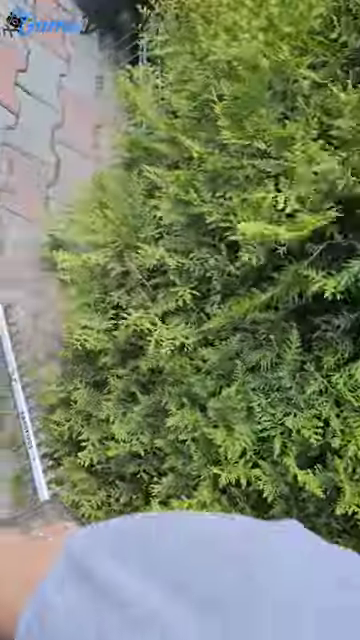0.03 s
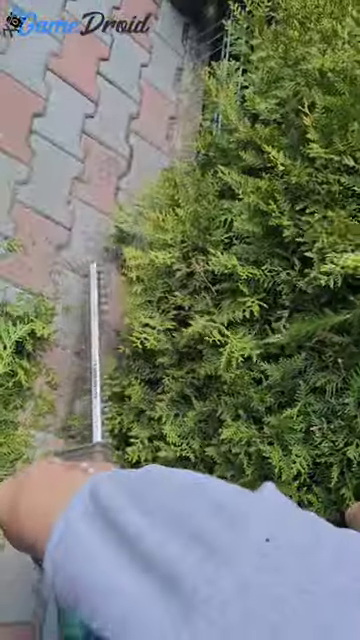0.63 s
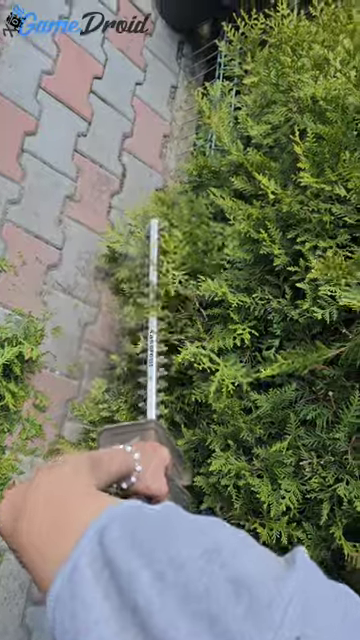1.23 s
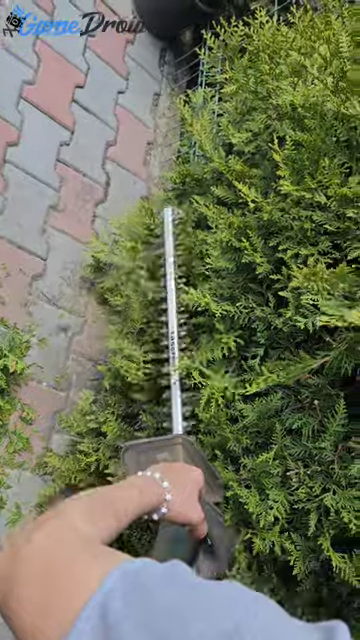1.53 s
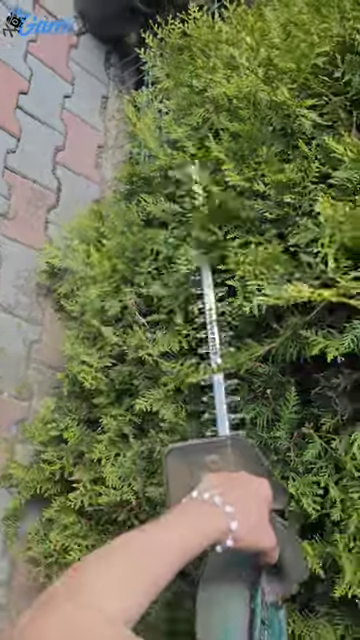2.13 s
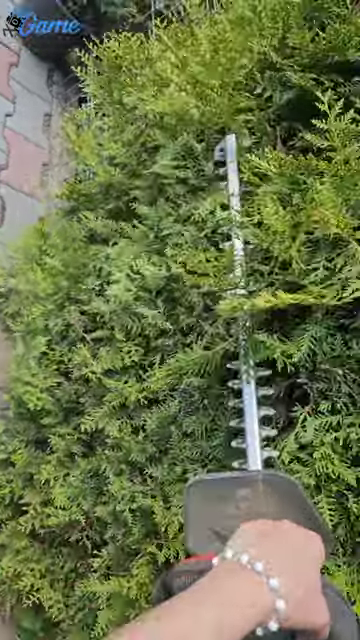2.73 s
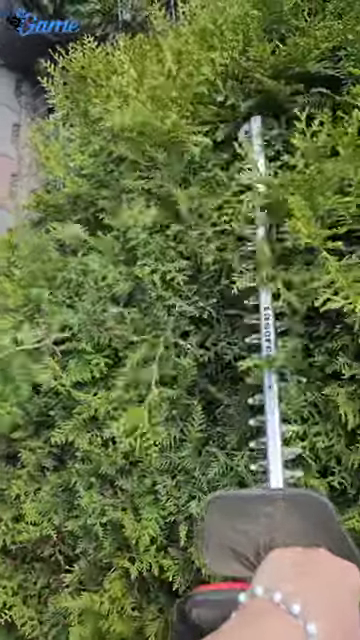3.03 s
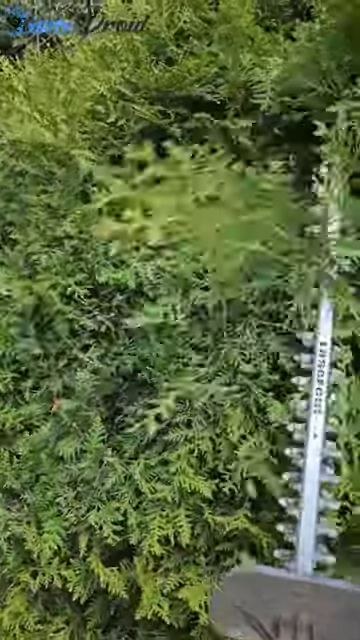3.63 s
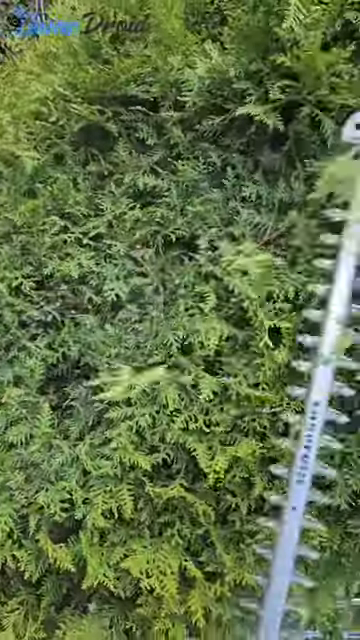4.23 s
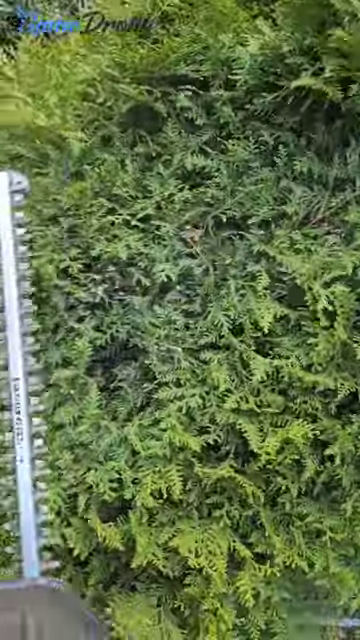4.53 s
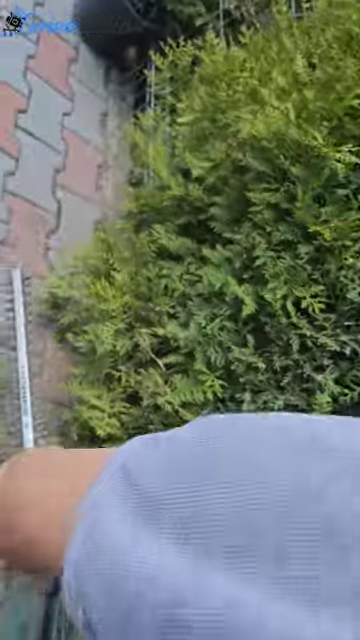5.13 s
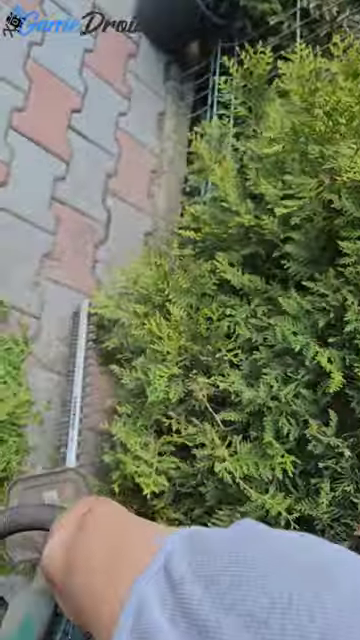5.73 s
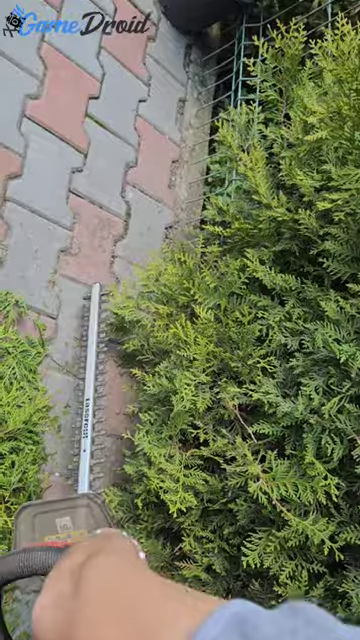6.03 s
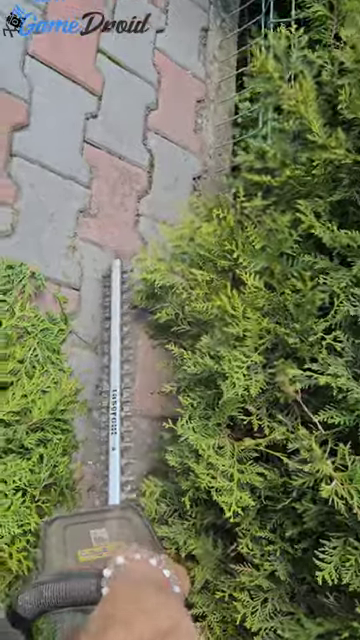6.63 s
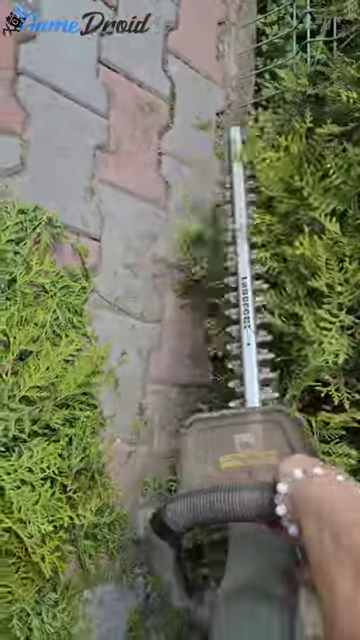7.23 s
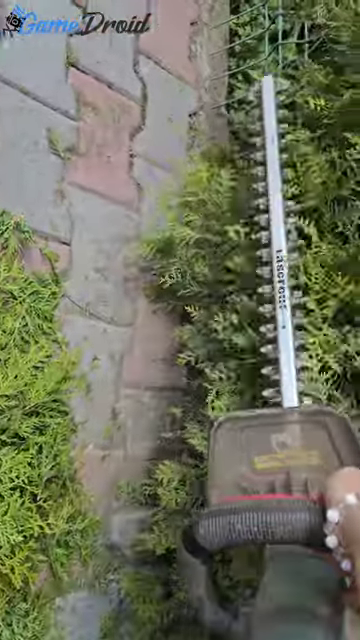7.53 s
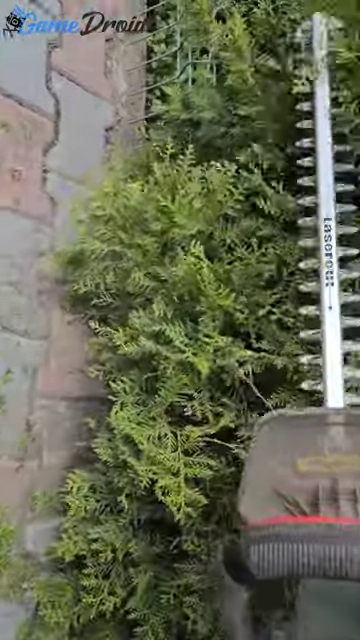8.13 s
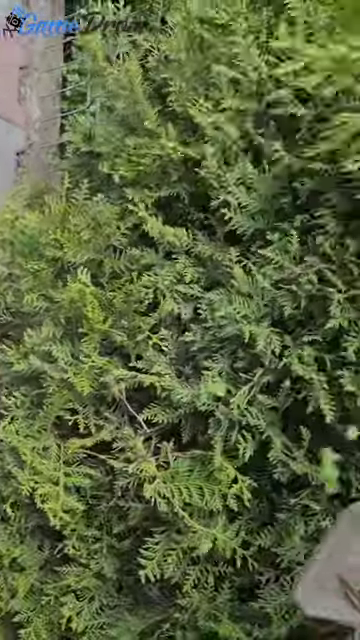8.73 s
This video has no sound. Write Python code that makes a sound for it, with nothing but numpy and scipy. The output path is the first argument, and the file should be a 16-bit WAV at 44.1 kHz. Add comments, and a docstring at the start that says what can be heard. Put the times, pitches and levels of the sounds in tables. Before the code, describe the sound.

In a quiet garden, a few small clicks lead into the loud, fast rattle of a hedge trimmer held close. Its blades shear twigs and chew woody stems with a faint metallic ring, while wind briefly bumps the microphone. The motor brakes, leaving about two seconds of soft leaf rustle and handle clicks. Then it spins up again, clacking freely before biting back into the hedge.

```python
"""A cordless hedge trimmer, very close, whirrs up and chatters into a conifer hedge, twice over.
Its crank turns 21-22 times a second: gears rattle, steel blades hiss, shear twigs on both strokes
and knock as they reverse, ringing the bar. Woody stems crunch and crack between the teeth.
Before and between the runs, foliage and a sleeve rustle and the grip clicks.
Behind it all lies a quiet garden, with a few puffs of wind on the microphone."""
import sys
import numpy as np
from scipy import signal
from scipy.fft import rfft, irfft, next_fast_len
from scipy.io import wavfile
from scipy.ndimage import uniform_filter1d, map_coordinates

SR = 44100
rng = np.random.default_rng(int(sys.argv[2]) if len(sys.argv) > 2 else 0)


def digitize_waveform(pressure):
    """Quantize a signal to 16-bit integers and store it at the path in sys.argv[1].

    Rows of a 2-D input are taken as channels; values are limited to [-1, 1].
    """
    field = np.atleast_2d(pressure).T
    bounded = np.clip(field, -1, 1)
    quanta = np.round(bounded * 32767).astype(np.int16)
    wavfile.write(sys.argv[1], SR, quanta)


N = 387638
TIME = np.arange(N) / SR
HARD_REVERSAL_REV, SOFT_REVERSAL_REV = .695, .175  # crank angles where the blades turn back

# Bright crackle of sprigs and clicks: frequency_hz, level_db
CRACKLE_SPECTRUM = [(1000, -14.5), (3500, -4), (7500, 2), (8600, -9.5), (9500, -7.5), (10800, -11.5),
                    (15500, -10.5)]


def trimmer():
    """One crank times the layers of the machine; the depth of the cut loads them."""
    # How far the blades are into the hedge: time_s, depth (0-1)
    hedge_depth = [(.8, 0.12), (1.05, 0.06), (1.15, 0.42), (2.01, 0.39), (2.05, 0.74), (2.32, 0.74),
                   (2.39, 0.43), (2.45, 0.78), (2.7, 0.77), (3.6, 0.98), (4.15, 0.67), (4.35, 0.35),
                   (6.75, 0.13), (6.98, 0.15), (7.12, 0.48), (7.27, 0.48), (7.4, 0.73), (7.8, 0.88),
                   (8.1, 0.63), (8.26, 0.31), (8.4, 0.8), (8.7, 0.96)]
    angle, speed, force = motor()
    depth = np.clip(automation(hedge_depth), 0, 1)
    cuts = force ** 3 * cutting(angle, speed, depth)
    accents = clack(angle, force, depth) + singing_modes(angle, speed, force) + woody_stems(force)
    rattle = drive_rattle(angle, speed, force, depth, cuts)
    return rattle + accents + blades(angle, force, depth, cuts) + motor_hum(angle, force, depth)


def motor():
    """Spin-up, cruise and brake, as crank angle (rev), speed (rev/s) and drive force (0-1)."""
    # Trigger pulls: pressed_s, released_s
    runs = [(0.253, 4.36), (6.506, 9)]
    # Cruising speed, sagging in thick growth: time_s, speed_rev_per_s
    cruise_speed = [(.9, 22.03), (1.1, 21.58), (1.73, 22.06), (2.58, 21.01), (3.28, 21.55), (3.45, 21),
                    (4.31, 21.62), (7.05, 21.88), (7.28, 22.16), (8.14, 22.1), (8.34, 22.47), (8.73, 20.89)]
    spin_up_s, force_build_s, brake_s = .07, .11, .037  # time constants
    cruise = automation(cruise_speed)
    angle, speed, force = np.zeros((3, N))
    for pressed, released in runs:
        on = TIME > pressed
        age = TIME[on] - pressed
        brake = np.exp(-np.maximum(TIME[on] - released, 0) / brake_s)
        speed[on] = cruise[on] * (1 - np.exp(-age / spin_up_s)) * brake
        force[on] = (1 - np.exp(-age / force_build_s)) * brake
        angle[on] = np.cumsum(speed[on]) / SR
    return angle, np.maximum(speed, 1), force


def drive_rattle(angle, speed, force, depth, cuts):
    """Gears rattle, the crank's play knocks at both reversals, and knocks and cuts ring the bar."""
    # Gear rattle: frequency_hz, level_db
    gear_spectrum = [(60, -29.5), (195, -8), (255, -9), (345, -4.5), (410, -5.5), (510, -3), (600, -6),
                     (780, -2.5), (1020, -3.5), (1620, -4), (2050, -1), (2450, -3.5), (3200, -5),
                     (4200, -7.5), (6500, -8.5), (16000, -38)]
    # Resonances of the gear housing: pitch_hz, width_hz, level_db
    housing_modes = [(203.6, 80, -19.5), (348, 73, -16.5), (512, 93, -8.5), (743, 110, -5.5), (923, 110, 0),
                     (1020, 110, -0.5), (1416, 94, -3), (1928, 92, -7.5), (3300, 1300, -12.5)]
    # Resonances of the blade bar: pitch_hz, width_hz, level_db
    bar_modes = [(1018, 30, 0.5), (1205, 59, -8), (1436, 120, -5.5), (1978, 110, -3), (2350, 60, -10),
                 (2570, 55, -0.5), (2990, 170, -3), (3400, 170, -4)]
    gears = layer_gain(force, depth, free_db=-30.5, load_db=4.5, force_power=2)
    gears *= amp(.51 * rubbing(angle, depth, at_rev=.81))
    gears = gears * teeth(angle, repeat_share=.37, spiky_db=5.5)
    hard = stroke(angle, speed, HARD_REVERSAL_REV, rise_s=.00026, t60_s=.036, scatter_db=2)
    soft = stroke(angle, speed, SOFT_REVERSAL_REV, rise_s=.00076, t60_s=.022, scatter_db=1)
    reversals = hard + soft
    knock_gain = layer_gain(force, depth, free_db=-31, load_db=10.5, force_power=1.2)
    knocks = knock_gain * reversals * teeth(angle, repeat_share=.21, spiky_db=3.5)
    bar_gain = layer_gain(force, depth, free_db=-35, load_db=10, force_power=5.5)
    bar = bar_gain * (.26 + reversals + amp(-.5) * cuts) * teeth(angle, repeat_share=.16, spiky_db=4)
    gearbox = radiate(gears, colour(gear_spectrum)) + radiate(knocks, body(housing_modes))
    return shimmer(gearbox + radiate(bar, body(bar_modes)), depth_db=1.4)


def teeth(angle, repeat_share, spiky_db):
    """Gritty tooth contacts: a share of them comes back alike in every revolution."""
    wear = rng.standard_normal((2, 2048))[:, (angle % 1 * 2048).astype(int)]
    return np.sqrt(repeat_share) * wear + np.sqrt(1 - repeat_share) * grains(spiky_db)


def blades(angle, force, depth, cuts):
    """Steel hisses over steel and shears the twigs; now and then a thicker one snaps."""
    # Sliding steel: frequency_hz, level_db
    steel_spectrum = [(1500, -23.5), (4000, 4), (6000, 7.5), (8000, 1.5), (12000, -1), (15500, 3)]
    # Shearing twigs: frequency_hz, level_db
    twig_spectrum = [(150, -31), (700, 0), (1500, -7), (3000, -4), (5000, -3), (8000, -0.5), (12000, -4),
                     (15500, -2)]
    # Thicker twigs giving way: start_s, level_db
    twig_snaps = [(1.142, -22), (1.188, -24), (1.279, -21), (1.94, -18), (2.0325, -13.5), (2.101, -12.5),
                  (2.359, -19), (2.4058, -14.5), (2.4293, -18), (2.4762, -17), (2.5241, -16), (2.6663, -17),
                  (2.738, -18), (3.161, -15.5), (3.3697, -18), (3.5368, -19), (3.5848, -15), (3.7487, -13),
                  (4.1704, -21), (4.1939, -20), (7.3033, -15), (7.4159, -18), (7.6868, -17.5),
                  (7.7327, -17.5), (7.8225, -18.5), (8.4091, -19), (8.5917, -17)]
    hiss_gain = layer_gain(force, depth, free_db=-31, load_db=6.5, force_power=4.5, near_share=.53)
    hiss = hiss_gain * amp(2.55 * rubbing(angle, depth, at_rev=.0317)) * grains(spiky_db=1.5)
    snaps = bursts(twig_snaps, t60_s=.025) * grains(spiky_db=2)
    shear = cuts * grains(spiky_db=5) + snaps
    return radiate(hiss, colour(steel_spectrum)) + radiate(shear, colour(twig_spectrum))


def rubbing(angle, depth, at_rev):
    """Friction peaks once a revolution; twigs between the blades even it out a little."""
    return (1 - .2 * depth) * np.cos(2 * np.pi * (angle - at_rev))


def cutting(angle, speed, depth):
    """Envelope of the teeth closing on twigs twice a revolution, a little later in thick growth."""
    lag_rev, back_from_depth = .022, .29  # the back stroke only finds twigs beyond this depth
    bite = angle - lag_rev * depth ** 2 + .0096 * wobble(30)
    back_depth = np.maximum(depth - back_from_depth, 0) / (1 - back_from_depth)
    forward = stroke(bite, speed, at_rev=.928, rise_s=.003, t60_s=.021, scatter_db=2.5)
    back = stroke(bite, speed, at_rev=.425, rise_s=.003, t60_s=.018, scatter_db=2.2)
    return amp(-2.5) * depth ** .75 * forward + amp(-.5) * back_depth ** .75 * back


def clack(angle, force, depth):
    """The hard reversal brings a dry clack and a brighter rebound, much alike in every revolution."""
    # Loudness of the clack, coming and going in spells, strongest in the second run: time_s, level_db
    clack_level = [(.65, -5), (1.1, -9), (1.2, -7), (1.7, -10), (1.77, -2), (1.97, -1), (2.12, -10),
                   (3.93, -14), (4.02, -1), (4.15, -7), (6.8, 0), (7.0, -4), (7.3, -8), (7.38, 1.5),
                   (7.77, 5), (7.88, 2), (8.15, 2), (8.22, -9), (8.33, 0), (8.6, -2)]
    # Dry body of the clack: pitch_hz, width_hz, level_db
    clack_modes = [(820, 200, -2), (1130, 240, 0), (1540, 300, -8.5), (1980, 220, -6), (2650, 250, -11),
                   (3200, 350, -8)]
    # Brighter body of the rebound: pitch_hz, width_hz, level_db
    rebound_modes = [(1390, 190, 5), (1680, 220, -1), (2000, 310, 1), (2600, 350, -7.5), (3350, 450, -10)]

    def impact(at_rev):
        """One impulse each time the driven crank passes this angle."""
        passing = np.diff(np.floor(angle - at_rev), prepend=-1) > 0
        mid_side = np.array([[1], [.35]])
        return passing * (force > .5) * amp(1.1 * wobble(20)) * mid_side

    hit = force ** 4 * amp(automation(clack_level)) * impact(at_rev=.672)
    rebound_gain = layer_gain(force, depth, free_db=-11.5, load_db=5.5, force_power=4, near_share=1.7)
    rebound = rebound_gain * impact(at_rev=.712 + .004 * wobble(20))
    return radiate(hit, body(clack_modes)) + radiate(rebound, body(rebound_modes))


def singing_modes(angle, speed, force):
    """Single modes of the bar and thin tones of the drive sing out for a while, struck anew by every reversal."""
    # Bar modes that bloom as the bar is pressed and twisted, and thin drive tones that swell while it runs
    # free: peak_s, half_width_s, pitch_hz, level_db
    blooms = [(.7, .35, 890, -32), (.7, .35, 1030, -33), (.7, .3, 2950, -39), (1.1, .45, 6240, -42),
              (2.05, .2, 915, -33), (2.65, .22, 950, -26.5), (3.02, .07, 940, -23), (3.2, .15, 1035, -27),
              (3.44, .12, 1015, -20.5), (3.7, .15, 970, -28), (4.0, .3, 1020, -26.5),
              (7.05, .3, 865, -33.5), (7.05, .3, 1940, -33), (7.05, .3, 2643, -36), (7.2, .4, 1470, -37),
              (7.8, .45, 3120, -33), (7.6, .25, 797, -31.5), (7.68, .1, 1180, -28), (8.3, .25, 1985, -32),
              (8.08, .09, 735, -26), (8.52, .08, 990, -23), (8.71, .09, 900, -18.5)]
    out = np.zeros(N)
    hard = stroke(angle, speed, HARD_REVERSAL_REV, rise_s=.003, t60_s=.11, scatter_db=3.5)
    soft = amp(-5) * stroke(angle, speed, SOFT_REVERSAL_REV, rise_s=.002, t60_s=.07, scatter_db=3)
    for at_rev, blow in (HARD_REVERSAL_REV, hard), (SOFT_REVERSAL_REV, soft):
        age = (angle - at_rev) % 1 / speed
        waver_rad = .6 * wobble(40)
        for peak_s, half_width_s, hz, db in blooms:
            on = np.abs(TIME - peak_s) < 3 * half_width_s
            swell = amp(db) * np.exp(-((TIME[on] - peak_s) / half_width_s) ** 2)
            out[on] += swell * blow[on] * np.sin(2 * np.pi * hz * age[on] + waver_rad[on])
    return force ** 2 * out * amp([[1], [-1]])  # leaning left


def woody_stems(force):
    """Stems caught between the teeth are chewed in uneven, crunchy bursts; the thickest crack."""
    # Spells of chewing: peak_s, half_width_s, level_db
    chews = [(2.18, .14, -39), (2.6, .15, -31.5), (3.0, 0.054, -35), (3.46, .12, -34.5), (8.55, .12, -31)]
    # Resonances of chewed stems: pitch_hz, width_hz, level_db
    stem_modes = [(563, 110, -3), (740, 150, -1), (1000, 150, -2.5), (1320, 240, -4.5), (3270, 290, -6.5)]
    # Thick stems cracking: start_s, level_db
    cracks = [(2.041, -22), (2.178, -22), (2.321, -25), (2.415, -19), (2.667, -21), (2.748, -22),
              (2.892, -22), (2.984, -21), (3.031, -20), (3.162, -20), (3.232, -20), (3.244, -20),
              (3.454, -21), (3.703, -20), (3.832, -22), (4.204, -24)]
    # Resonances of cracking wood: pitch_hz, width_hz, level_db
    wood_modes = [(760, 220, -2), (1050, 260, 0), (1400, 300, -4), (2400, 600, -8), (3300, 600, -8)]
    crunch = amp(5 * np.tanh(wobble(90))) * grains(spiky_db=3.5)
    chewing = radiate(force ** 2 * swells(chews) * crunch, body(stem_modes))
    return chewing + radiate(bursts(cracks, t60_s=.035) * grains(spiky_db=5), body(wood_modes))


def motor_hum(angle, force, depth):
    """A trembling hum whose strongest tone steps down one crank order under load."""
    # Drive tones, the motor turning 15 times per crank turn: crank_order, free_db, cutting_db
    partials = [(9, -11, -9), (10, -7, -16), (15, -12, 2.5), (16, 1.5, -7), (22, -8, -14)]
    # Rise and fall of the hum: time_s, level_db
    hum_level = [(.6, -49.5), (1.25, -54.5), (1.6, -50), (2.06, -47), (2.35, -53), (2.9, -54), (3.4, -56),
                 (3.9, -50), (4.25, -53), (6.7, -49), (7.3, -53.5), (7.8, -49.5), (8.2, -42.5), (8.65, -50)]
    load = np.minimum(depth / .42, 1)  # fully loaded from this depth on
    phase = 2 * np.pi * angle + .008 * wobble(40)
    tones = np.zeros(N)
    for order, free_db, cutting_db in partials:
        gain = amp(free_db + (cutting_db - free_db) * load)
        tones += gain * np.sin(order * (phase + rng.uniform(0, 2 * np.pi)))
    return force ** 2 * amp(automation(hum_level) + .8 * wobble(31)) * tones


def gear_whirrs():
    """Thin gear tones swell and fade, gliding where the speed changes."""
    # Starting, running free, labouring, braking: start_s, length_s, first_hz, last_hz, level_db
    whirrs = [(0.403, 0.036, 560, 670, -34), (.66, .84, 2293, 2293, -43), (2.06, .7, 585, 515, -42.5),
              (4.35, 0.024, 710, 563, -26.5)]
    out = np.zeros(N)
    for start_s, length_s, first_hz, last_hz, db in whirrs:
        progress = np.clip((TIME - start_s) / length_s, 0, 1)
        hz = first_hz + (last_hz - first_hz) * progress
        out += amp(db) * np.sin(np.pi * progress) * np.sin(2 * np.pi * np.cumsum(hz) / SR)
    return out


def foliage():
    """Sprigs and a sleeve rub softly all the time; each brush swells and dies away."""
    # Brushes against the hedge: start_s, rustle_db, rise_s, t60_s, crackle_db
    brushes = [(.04, -58, 0.075, 0.11, -67), (.13, -80, 0.044, 0.22, -63), (4.38, -66, 0.024, 1.3, -62),
               (4.52, -67, 0.039, 0.63, -57), (4.73, -59, 0.079, 0.45, -55), (4.88, -44.5, 0.087, 0.3, -48),
               (4.975, -40, 0.033, 0.065, -41.5), (5.1, -70, 0.015, 0.43, -96),
               (5.62, -67, 0.024, 0.21, -74), (5.985, -34, 0.022, 0.14, -40.5),
               (6.018, -42, 0.019, 0.095, -47), (6.06, -62, 0.038, 0.48, -61), (6.2, -57, 0.073, 0.54, -57),
               (6.33, -75, .09, 1.6, -59.5)]
    # Soft rustle: frequency_hz, level_db
    leaf_spectrum = [(100, -8), (250, -5.5), (600, -2), (1000, -4.5), (2000, -7), (3500, -20), (7000, -15),
                     (16000, -65)]
    rub, crackle = amp(-63), amp(-85)  # the constant bed of sleeve and sprigs
    for start_s, rustle_db, rise_s, t60_s, crackle_db in brushes:
        age = np.maximum(TIME - start_s, 0)
        push = np.minimum(age / rise_s, 1) * amp(-60 * np.maximum(age - rise_s, 0) / t60_s)
        rub = rub + amp(rustle_db) * push
        crackle = crackle + amp(crackle_db) * push
    clumps = amp(1.7 * wobble(70))
    rustle = radiate(rub * clumps * grains(spiky_db=4.5), colour(leaf_spectrum))
    return rustle + radiate(crackle * clumps * grains(spiky_db=3), colour(CRACKLE_SPECTRUM))


def handling():
    """Each click is a short snap and a knock in the plastic grip; a few things ring faintly."""
    # Clicks of the grip and of flicking twigs: start_s, knock_db, snap_db, t60_s
    clicks = [(.021, -53.5, -39, 0.046), (.061, -51, -60, .028), (0.104, -47, -40, 0.025),
              (.287, -46, -58, 0.027), (.365, -50, -33, .025), (4.632, -45, -35, 0.026),
              (4.675, -47, -64.5, 0.061), (4.813, -50, -52, .025), (4.918, -37, -45, .025),
              (4.995, -37, -47, 0.033), (5.115, -37, -75, 0.016), (5.158, -41, -60.5, 0.04),
              (5.624, -34.5, -27.5, 0.022), (5.939, -37.5, -39.5, 0.023), (5.997, -33, -40, .04),
              (6.082, -60, -46, .025), (6.097, -54, -49, .025), (6.276, -41, -52, 0.025),
              (6.453, -41, -31, 0.025), (6.497, -48, -52, .03)]
    # Resonances of the grip: pitch_hz, width_hz, level_db
    grip_modes = [(730, 110, 4), (1020, 390, 1.5), (1850, 510, -6.5), (3680, 640, -12.5)]
    # Dull bumps and faint rings: start_s, pitch_hz, level_db, t60_s
    rings = [(.06, 3870, -60, .12), (5.116, 800, -29.5, 0.032), (5.16, 693, -52, 0.43),
             (5.16, 1060, -55, 0.35), (5.16, 1660, -60, 0.42), (5.665, 1085, -50, 0.32),
             (5.793, 436, -32.5, 0.038), (6.49, 3910, -54, 1)]
    knock, snap, ring = np.zeros((3, N))
    for start_s, knock_db, snap_db, t60_s in clicks:
        decay = (TIME >= start_s) * amp(-60 * np.maximum(TIME - start_s, 0) / t60_s)
        knock += amp(knock_db) * decay
        snap += amp(snap_db) * decay
    for start_s, hz, db, t60_s in rings:
        age = np.maximum(TIME - start_s, 0)
        attack = 1 - np.exp(-age / .0032)
        ring += amp(db - 60 * age / t60_s) * attack * np.sin(2 * np.pi * hz * age)
    contact = rng.standard_normal((2, N))
    knocks = radiate(knock * contact, body(grip_modes))
    return knocks + radiate(snap * contact, colour(CRACKLE_SPECTRUM)) + ring


def reflections(sound):
    """A brief scatter off the paving and the hedge."""
    delay_s, t60_s = .005, .053
    age = np.arange(SR // 5) / SR
    tail = rng.standard_normal((2, len(age))) * (age > delay_s) * amp(-60 * age / t60_s)
    return signal.fftconvolve(sound, tail / np.linalg.norm(tail[0]), axes=1)[:, :N]


def wind():
    """A few low, fluttering puffs buffet the microphone."""
    # Puffs of wind: peak_s, half_width_s, level_db
    gusts = [(.08, 0.059, -56), (.6, 0.12, -44.5), (.81, 0.043, -29.5), (1.06, 0.14, -42),
             (1.52, 0.22, -42), (4.8, 0.13, -48)]
    # Their rumble: frequency_hz, level_db
    buffet_spectrum = [(20, -2), (50, 3.5), (100, -5), (200, -20), (500, -52), (2000, -74)]
    envelope = swells(gusts) * amp(1.2 * wobble(14))
    return envelope * radiate(rng.standard_normal((2, N)), colour(buffet_spectrum))


def garden():
    """A quiet, gently breathing bed of outdoor noise."""
    # Garden ambience: frequency_hz, level_db
    garden_spectrum = [(22, -9), (45, -3.5), (65, 0.5), (100, -4.5), (150, -12.5), (250, -12.5), (400, -25),
                       (600, -17), (1500, -39), (3000, -45), (8000, -62.5), (15000, -43.5)]
    return amp(-52.5 + .52 * wobble(4)) * radiate(rng.standard_normal((2, N)), colour(garden_spectrum))


def layer_gain(force, depth, free_db, load_db, force_power, near_share=1):
    """A machine layer grows with drive force, with depth of cut and as the trimmer comes nearer."""
    # Lift from holding the trimmer closer: time_s, gain_db
    nearness = [(.6, -1), (1.9, -1.5), (3.3, -0.5), (4.3, -1.5), (6.56, 3), (6.77, 2.5), (7.7, -0.5),
                (8.3, 2.6), (8.65, 1.5)]
    return amp(free_db + load_db * depth + near_share * automation(nearness)) * force ** force_power


def stroke(angle, speed, at_rev, rise_s, t60_s, scatter_db):
    """Envelope of a blow that lands once a revolution, each with its own strength."""
    count, fraction = np.divmod(angle - at_rev + 1, 1)
    age = fraction / speed
    strength = amp(scatter_db * rng.uniform(-1, 1, 256))[count.astype(int)]
    return strength * (1 - np.exp(-age / rise_s)) * amp(-60 * age / t60_s)


def bursts(rows, t60_s):
    """Envelope of sudden, fast-dying bursts from rows of start_s, level_db."""
    out = np.zeros(N)
    age = np.arange(SR // 10) / SR
    for start_s, db in rows:
        out[round(start_s * SR):][:len(age)] += amp(db - 60 * age / t60_s)
    return out


def swells(rows):
    """Envelope of bell-shaped swells from rows of peak_s, half_width_s, level_db."""
    return sum(amp(db) * np.exp(-((TIME - peak_s) / width_s) ** 2) for peak_s, width_s, db in rows)


def grains(spiky_db):
    """Two streams of tiny contacts whose size changes within a millisecond."""
    return unit(rng.standard_normal((2, N)) * amp(spiky_db * np.tanh(wobble(1500))))


def shimmer(sound, depth_db):
    """The spectrum swells and fades at random in patches about 200 Hz wide."""
    spectra = signal.stft(sound, nperseg=1024)[2]
    patches = uniform_filter1d(rng.standard_normal(spectra.shape[1:]), size=5, axis=0)
    patches = uniform_filter1d(patches, size=12, axis=1)
    gain = unit(amp(depth_db * unit(patches)))
    return signal.istft(spectra * gain, nperseg=1024)[1][:, :N]


def radiate(pair, response):
    """A mid/side pair through a unit-power response: centred in the bass, wide in the treble."""
    # Likeness of left and right: frequency_hz, correlation
    likeness = [(60, 0.94), (200, 0.99), (500, 0.87), (1000, 0.6), (1600, 0), (2500, 0), (15000, 0.011)]

    def mix(hz):
        spread = np.arccos(np.clip(along(likeness, hz), -1, 1)) / 2
        gain = response(hz)
        return gain / np.sqrt(np.mean(np.abs(gain) ** 2)) * np.array([np.cos(spread), np.sin(spread)])

    mid, side = filtered(pair, mix)
    return np.array([mid + side, mid - side])


def body(modes):
    """Causal response of resonances of alternating polarity, from rows of pitch_hz, width_hz, level_db."""
    return lambda hz: sum((-1) ** k * amp(db) * 1j * hz * width / (pitch ** 2 - hz ** 2 + 1j * hz * width)
                          for k, (pitch, width, db) in enumerate(modes))


def colour(points):
    """An EQ curve through points of frequency_hz, level_db."""
    return lambda hz: amp(along(points, hz))


def filtered(sound, response):
    """Apply a complex frequency response."""
    size = next_fast_len(N + SR // 4)
    return irfft(rfft(sound, size) * response(np.fft.rfftfreq(size, 1 / SR)), size)[..., :N]


def wobble(rate):
    """A smooth random curve, rate knots a second."""
    return map_coordinates(rng.standard_normal(int(N * rate / SR) + 4), [TIME * rate])


def automation(points):
    """One value per sample from points of time_s, value."""
    return np.interp(TIME, *np.transpose(points))


def along(points, hz):
    """Read points of frequency_hz, value on a log axis."""
    knots_hz, values = np.transpose(points)
    return np.interp(np.log(hz + 1), np.log(knots_hz + 1), values)


def amp(db):
    """Decibels to gain."""
    return 10 ** (np.asarray(db) / 20)


def unit(x):
    """Scale to rms 1."""
    return x / np.sqrt(np.mean(x ** 2) + 1e-20)


def scene():
    """Trimmer, foliage and handling up close with their reflections, over the open air."""
    near = trimmer() + gear_whirrs() + foliage() + handling()
    return near + amp(-13) * reflections(near) + wind() + garden()


def record(dry):
    """Each microphone port colours the treble in its own way, under a steep high cut."""
    # Tone of the left port: frequency_hz, gain_db
    left_port = [(700, -1), (1400, -0.5), (2300, -2), (3300, -0.5), (6700, -5), (7700, 0), (8600, 2.5),
                 (9500, -3), (10700, 2), (12200, 3.5), (13800, 1), (15200, -1)]
    # Tone of the right port: frequency_hz, gain_db
    right_port = [(700, -2), (1400, -2.5), (2300, -1), (3300, 1.5), (5200, -7.5), (6400, -9.5),
                  (8700, -11.5), (9400, -32.5), (10600, -6.5), (12100, -2.5), (13700, -13.5), (15200, -7.5)]
    high_cut_hz = 15750
    ports = lambda hz: amp([along(left_port, hz), along(right_port, hz)])
    return filtered(dry, lambda hz: ports(hz) / np.sqrt(1 + (hz / high_cut_hz) ** 200))


dry = scene()
out = record(dry)
digitize_waveform(out)
```